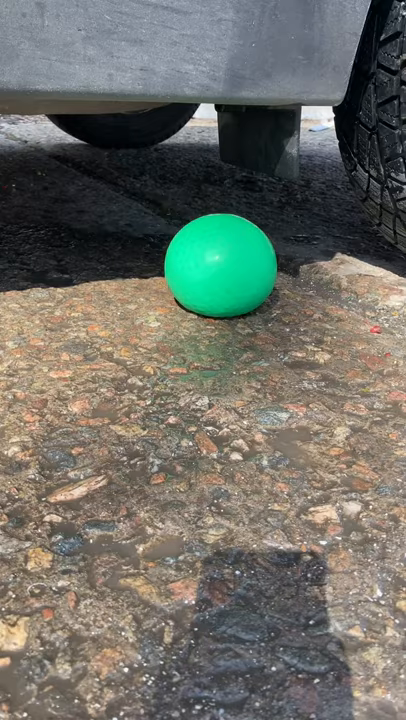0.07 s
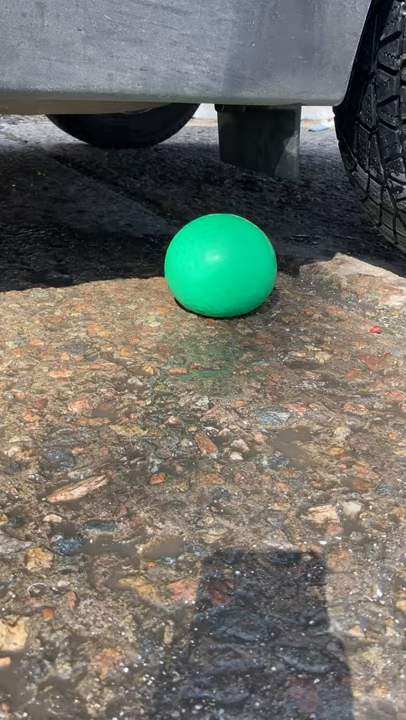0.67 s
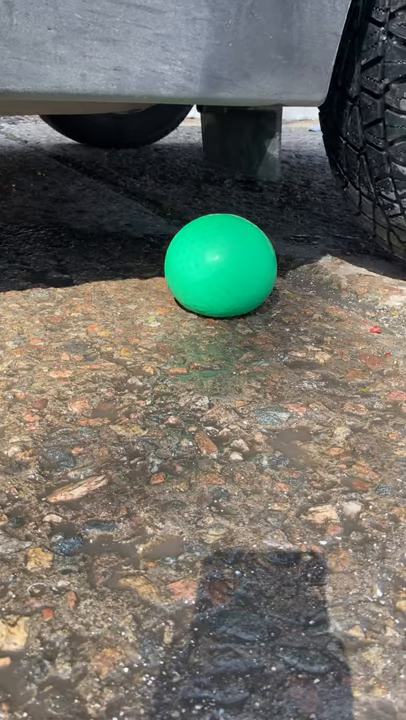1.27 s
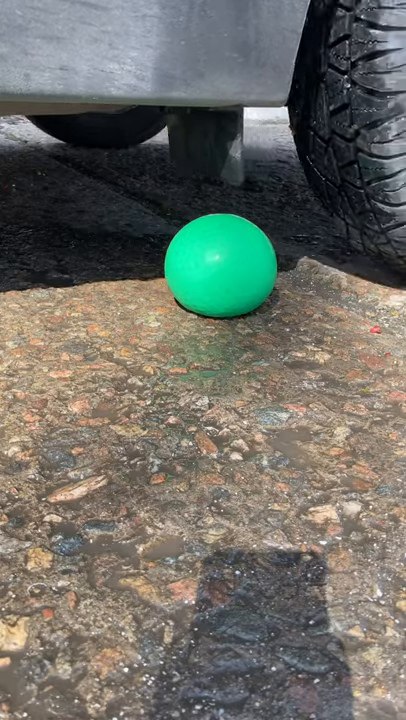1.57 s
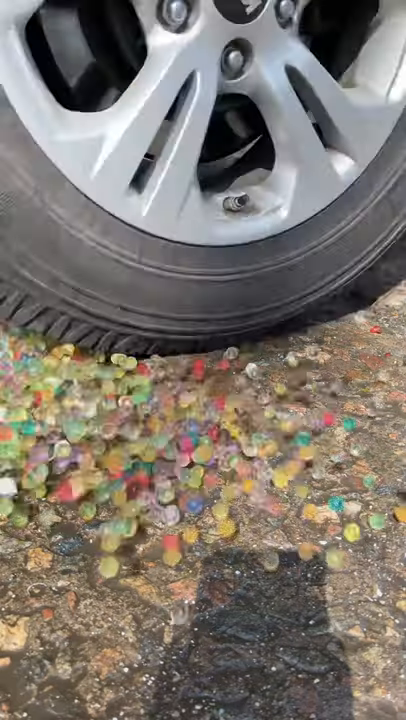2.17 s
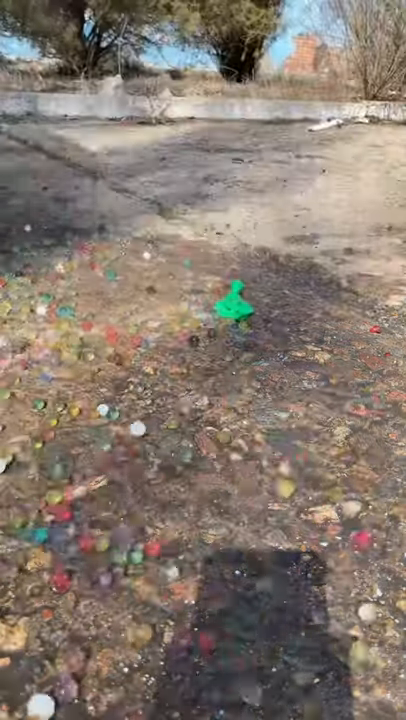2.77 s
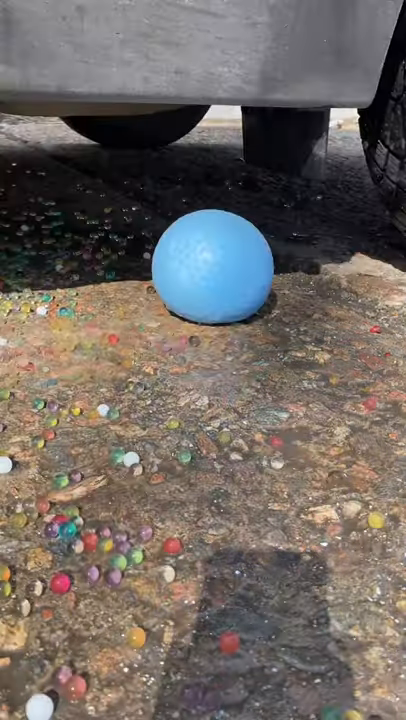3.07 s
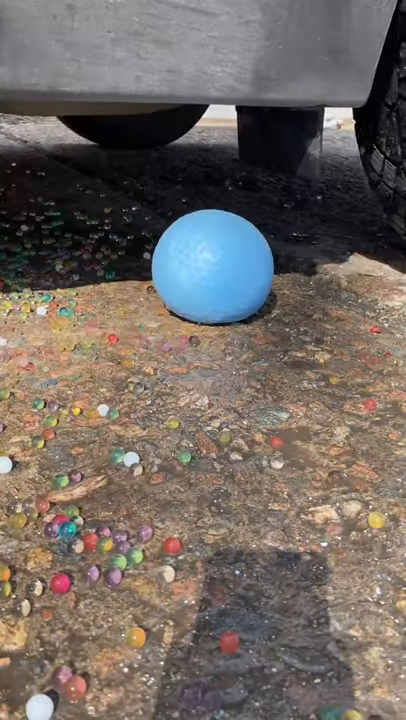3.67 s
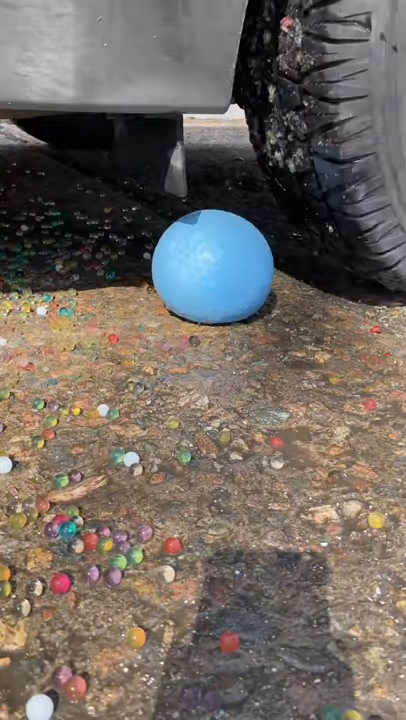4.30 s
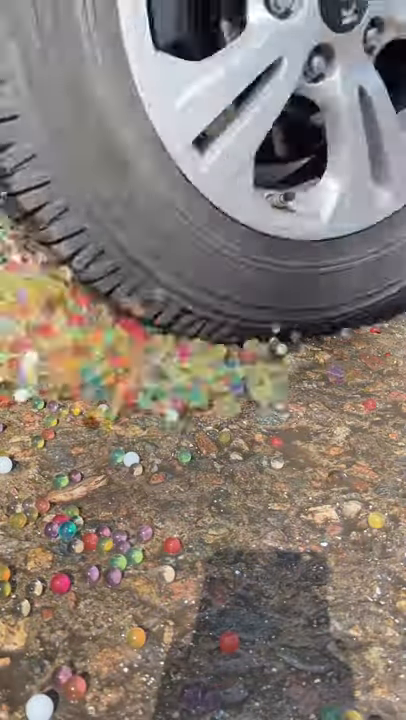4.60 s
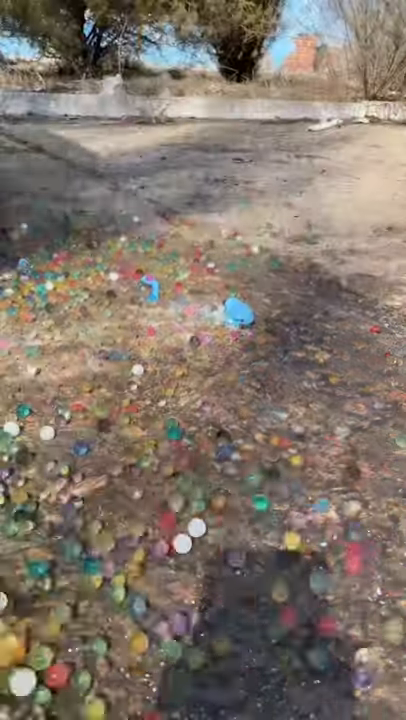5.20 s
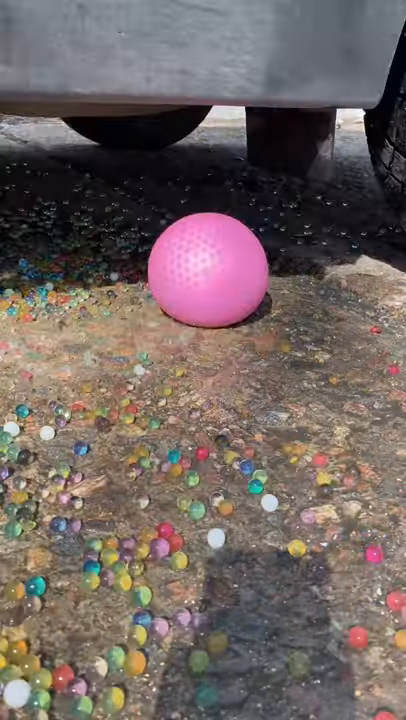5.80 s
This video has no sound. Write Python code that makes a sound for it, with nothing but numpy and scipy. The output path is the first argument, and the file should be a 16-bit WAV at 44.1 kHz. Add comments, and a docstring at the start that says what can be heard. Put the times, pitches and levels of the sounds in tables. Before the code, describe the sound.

A car idles outdoors with a low throb and light valve clatter, heard close from the concrete. At about 1.1 seconds it pulls forward, the engine rising into a growl as grit crunches under the tyre. At 2 seconds a balloon bursts with a sharp rubbery crack and thump, and the engine suddenly drops in level. Wet beads snap and gush from about 2.2 seconds, thinning into patter and small plips by 2.7. At 3 seconds the sound cuts back to idle with a dull tick. The car moves off again around 3.6 seconds, and a second balloon bursts at 4.5. Another wet spray follows from 4.6 to 4.9 seconds, with sharp snaps near its end. Stray beads bounce and the wet tread sizzles faintly over the receding engine. At 5.4 seconds the sound jumps back to idle.

```python
"""On concrete, heard from the ground, a car rolls over two balloons filled with water beads. Its firings
excite exhaust, block and valve gear as it idles, then pulls away with grit crunching under the tyre.
The stretched rubber rips and cracks open, the car's level dips, and wet beads spray, pop and bounce:
a mass of small damped oscillators. The sound jumps back to idle, the car bursts the second balloon
in the same way, and the sound jumps to idle once more."""
import sys
import numpy as np
from scipy import signal
from scipy.fft import rfft, irfft, next_fast_len
from scipy.io import wavfile
from scipy.ndimage import uniform_filter1d

SR = 44100
rng = np.random.default_rng(int(sys.argv[2]) if len(sys.argv) > 2 else 0)


def log_audio(samples):
    """Write samples as a 16-bit WAV file to the path given in sys.argv[1]."""
    # one column per channel
    frames = np.atleast_2d(samples).T
    # limit to full scale, then quantise
    limited = np.clip(frames, -1, 1)
    pcm = np.round(limited * 32767).astype(np.int16)
    wavfile.write(sys.argv[1], SR, pcm)


N = 257984
T = np.arange(N) / SR

# Each row, one balloon: tear time in s, level in dB and ring in Hz; crack time in s and level in dB;
# thump time in s, level in dB, pitch fall in Hz and time for half that fall in s; slap level in dB.
RUPTURES = [(1.9741, -17.5, 5900, 1.9808, -15.5, 1.9828, -11.5, 900, .00042, -21),
            (4.4672, -20.5, 4905, 4.4748, -13.5, 4.4783, -11.5, 560, .0014, -27)]
# Each row, one balloon's beads: start and length of the full gush in s, its level in dB,
# its decay in s, level of the trickle in dB.
GUSHES = [(2.193, 0.086, -28.5, 0.1, -48.5), (4.632, 0.23, -36.5, 0.045, -36)]
# Each row, one drive: moving-off time in s, then the fading after the burst in dB per s,
# first of the exhaust, then of block and clatter.
DEPARTURES = [(1.13, 6.5, 12), (3.555, 2.5, 6.5)]
OPENS_S = [row[3] for row in RUPTURES]  # each balloon cracks open
BACK_TO_IDLE_S = (3.0335, 5.435)
SPRAY_ATTACK_S, DIP_ATTACK_S = 0.019, 0.014
EXHAUST_DB = -29  # base level at idle


def balloons():
    """Release of elastic energy: rubber rips, cracks open and flutters; the filling slaps and thumps."""
    # Spectra of tear, crack and slap. Each row: frequency in Hz, level in dB.
    tear_colour = [(200, -22.5), (900, -9), (2500, -3), (4000, -2), (6000, -3), (7000, -12.5), (16000, -17)]
    crack_colour = [(150, -12), (380, 7), (750, 0), (1300, 0), (2500, 1), (4000, 0.5), (6500, -4.5),
                    (8000, -5), (12000, 0), (16000, -5)]
    slap_colour = [(100, -14), (330, -3), (470, 1), (620, -3), (850, -13), (1150, -8), (1500, -16),
                   (5000, -44)]
    out = np.zeros(N)
    for rupture in RUPTURES:
        tear_s, tear_db, tear_hz, crack_s, crack_db = rupture[:5]
        thump_s, thump_db, fall_hz, glide_s, slap_db = rupture[5:]
        tear = puff(tear_colour, hold_s=0.0026, decay_s=0.005)
        add(out, tear_s, undb(tear_db) * resonant(tear, [(tear_hz, 400, 0)]))
        add(out, crack_s, undb(crack_db) * puff(crack_colour, hold_s=0.003, decay_s=0.0019))
        shreds = puff(tear_colour, hold_s=0.0117, decay_s=0.011)
        add(out, crack_s, undb(crack_db - 16) * shreds)
        add(out, crack_s, undb(slap_db) * puff(slap_colour, hold_s=.005, decay_s=0.002))
        add(out, thump_s, undb(thump_db) * thump(fall_hz, glide_s))
    return out


def thump(fall_hz, glide_s, end_hz=20, decay_s=.0115, kick_s=0.0012, size=4096):
    """Volume displacement: the filling kicks the air, and the pitch dives as the balloon opens out."""
    t = np.arange(size) / SR
    hz = fall_hz / (1 + t / glide_s) + end_hz
    level = np.exp(-t / decay_s) + undb(-5) * np.exp(-t / kick_s)
    return np.sin(2 * np.pi * np.cumsum(hz) / SR) * level


def spray():
    """Superposed clicks and bubble tones: wet beads trickle, then gush as the tyre flattens the balloon."""
    # Each row: frequency in Hz, level in dB.
    bead_colour = [(200, -21.5), (700, -21), (1200, -8.5), (1700, -4.5), (2800, 0.5), (4200, -1.5),
                   (5300, -8), (7000, -7), (10000, -9), (16000, -10)]
    trickle_delay_s, trickle_decay_s = 0.067, 0.13
    flow = np.zeros(N)
    for (start_s, length_s, gush_db, decay_s, trickle_db), open_s in zip(GUSHES, OPENS_S):
        end_s = start_s + length_s
        flow += undb(gush_db) * envelope(start_s, end_s, SPRAY_ATTACK_S, decay_s)
        trickle = envelope(open_s + trickle_delay_s, end_s, SPRAY_ATTACK_S, trickle_decay_s)
        flow += undb(trickle_db) * trickle
    crackle = unit(colour(patter(per_second=12000, spread_db=3.0, cycles=3.5), bead_colour))
    bubbles = unit(colour(patter(per_second=1200, spread_db=1.5, cycles=12), bead_colour))
    return unit(crackle + undb(-9) * bubbles) * clumps(per_second=140, spread_db=2.5) * flow


def snaps(relative_bandwidth=0.55, size=2048):
    """Damped resonance: a bead or bit of grit snaps under the tread with a short ring and a splash."""
    # Each row: start in s, peak in dB, ring in Hz, decay in s, relative level of the splash in dB.
    pops = [(2.071, -34, 3300, 0.0039, -18), (2.076, -32, 3280, .007, -26), (2.1168, -31, 2600, .003, -22),
            (2.136, -29, 2200, 0.0036, -16), (2.188, -13, 2240, 0.0023, -14),
            (2.206, -12, 2330, 0.0072, -19.5), (2.212, -13, 3570, 0.0044, -20.5),
            (2.25, -15.5, 2000, .005, -20), (2.253, -12, 3270, 0.0045, -26), (2.267, -15, 2900, .006, -16),
            (2.282, -11.5, 3010, 0.012, -18), (2.289, -16, 2500, .004, -19), (2.307, -11, 2930, 0.006, -15),
            (2.329, -21, 7500, .002, -6), (2.356, -11, 2640, 0.0044, -12),
            (2.4134, -13.5, 3000, 0.0016, -4), (2.443, -18.5, 2000, 0.0022, -4),
            (2.489, -21.5, 2780, 0.0017, -17), (2.5546, -27, 1280, 0.016, -8),
            (2.616, -33, 2190, 0.0022, -12), (2.6775, -20.5, 1800, 0.0016, -2),
            (4.5382, -15.5, 2770, .003, -29), (4.565, -23.5, 2700, 0.0067, -22),
            (4.6084, -20, 2000, 0.0056, -25), (4.6426, -15.5, 1790, .007, -22),
            (4.649, -12, 2500, .004, -18), (4.663, -12.5, 2675, 0.0024, -19),
            (4.6938, -18, 2700, .004, -27), (4.724, -16, 2796, 0.0079, -19), (4.757, -3, 3840, 0.001, -36),
            (4.799, -18, 2790, .006, -10), (4.807, -17.5, 3220, .003, -17),
            (4.8414, -16, 3470, 0.0069, -24), (4.864, -22, 3000, 0.0039, -22),
            (4.9267, -6, 3320, 0.004, -2), (4.936, -21, 2320, .003, -10),
            (5.098, -23.5, 520.2, 0.0029, -25), (5.142, -25, 710, .003, -21)]
    # Each row: frequency in Hz, level in dB.
    splash_colour = [(300, -9.5), (1500, -1), (4500, -1.5), (7000, -1), (16000, -7.5)]
    out, t = np.zeros(N), np.arange(size) / SR
    for start_s, db, hz, decay_s, splash_db in pops:
        push = rng.standard_normal(size) * np.exp(-t / decay_s)
        resonance = signal.iirpeak(hz, 1 / relative_bandwidth, fs=SR)
        pop = signal.lfilter(*resonance, signal.lfilter(*resonance, push))
        pop += undb(splash_db) * colour(push, splash_colour, size=size)
        add(out, start_s, undb(db) * pop / np.abs(pop).max())
    return out


def wheel(beads):
    """Sympathetic vibration: the beads are heard with the faint ringing they excite in the alloy wheel."""
    # Each row: frequency in Hz, bandwidth in Hz, gain in dB.
    wheel_modes = [(2534, 14, -2), (2727, 12, -4), (2850, 16, -3), (3040, 20, -2), (3240, 18, -5.5),
                   (3500, 20, -13), (3600, 17, -5.5), (4080, 22, -4)]
    return resonant(beads, wheel_modes)


def splatter(relative_db=-12, decay_s=0.19):
    """Soft impacts: the wet mass of beads lands on concrete in a low rustle that outlasts each gush."""
    # Each row: frequency in Hz, level in dB.
    splatter_colour = [(200, -10), (550, -3.5), (800, -3.5), (1100, 1.5), (1650, -2.5), (3000, -10),
                       (6000, -15), (16000, -24)]
    landing = sum(undb(db + relative_db) * envelope(s, s + length_s, SPRAY_ATTACK_S, decay_s)
                  for s, length_s, db, *_ in GUSHES)
    return unit(colour(patter(per_second=6000, spread_db=2.5, cycles=1.8), splatter_colour)) * landing


def plips(glide_per_s=9, splash_db=-9, size=2048):
    """Bubble resonance: a wet bead lands and traps air, which rings with a short rising tone."""
    # Each row: start in s, level in dB, starting pitch in Hz, time to the peak in s.
    landings = [(2.395, -26, 1200, 0.0014), (2.406, -26, 1640, 0.0016), (2.48, -31.5, 2300, .0022),
                (2.524, -33, 910, 0.0015), (2.552, -31.5, 1170, 0.0017)]
    out, t = np.zeros(N), np.arange(size) / SR
    for start_s, db, hz, rise_s in landings:
        tone = np.sin(2 * np.pi * hz * t * (1 + glide_per_s * t / 2))
        splash = undb(splash_db) * rng.standard_normal(size)
        swell = t / rise_s * np.exp(1 - t / rise_s)
        add(out, start_s, undb(db) * swell * (tone + splash))
    return out


def strays(level_db=-45):
    """Sparse impacts: single beads bounce on the concrete during each gush and a while after it."""
    # Each row: frequency in Hz, level in dB.
    bounce_colour = [(300, -20.5), (900, -2), (1500, 0.5), (2800, -1), (5000, -11), (16000, -20)]
    bouncing = sum(envelope(s, s + length_s, SPRAY_ATTACK_S, decay_s=0.22) for s, length_s, *_ in GUSHES)
    bounces = unit(colour(patter(per_second=160, spread_db=3.5, cycles=2.4), bounce_colour))
    return bounces * bouncing * undb(level_db)


def engine():
    """Periodic excitation: one firing rate drives exhaust, block and valve gear."""
    hz, revs, exhaust_db, block_db, clatter_db = driving()
    cycles = np.cumsum(hz) / SR
    exhaust_cycles = cycles + .5  # half a firing interval apart
    boom = exhaust(exhaust_cycles, revs) * undb(exhaust_db)
    # under load the exhaust's overtones are ragged
    ragged = unit(firings(exhaust_cycles, scatter_db=2, lumpy_db=1)) + undb(-10) * rng.standard_normal(N)
    body = (block(cycles) + growl(ragged, revs)) * undb(block_db)
    return boom + tailpipe(ragged) + body + valve_gear(cycles) * undb(clatter_db)


def driving():
    """Resonance, load and level dips: gives firing rate, revs (0-1), exhaust, block and clatter in dB."""
    # One list a drive. Each row: time in s, firings per s.
    firing_rates = [
        [(0.04, 27.5), (0.71, 26.4), (0.99, 27.8), (1.2, 29.3), (1.51, 39.5), (1.6, 43), (1.8, 45.8),
         (2.11, 46), (2.35, 43), (2.43, 44), (3.02, 40.2)],
        [(3.05, 27.5), (3.5, 26.2), (3.68, 30.2), (3.99, 43.2), (4.2, 45.1), (4.77, 48.5), (4.83, 50.4),
         (5.17, 50.3), (5.42, 48.4)],
    ]
    # The car's level dips after each burst and stays a little lower. Each row: depth for the exhaust
    # in dB, depth for block and clatter in dB, recovery in s.
    level_dips = [(22.6, 12.5, 0.2), (15.7, 2.5, 0.48)]
    idle_hz, pull_hz = 26.44, 45.1
    boom_hz, boom_width_hz = 39.15, 5.3  # the exhaust's resonance
    load_lead_s, dip_delay_s = 0.28, .005
    hz, begins_s = np.full(N, idle_hz), 0
    for rate, end_s in zip(firing_rates, BACK_TO_IDLE_S):
        hz = np.where((T >= begins_s) & (T < end_s), np.interp(T, *np.transpose(rate)), hz)
        begins_s = end_s
    revs = np.clip((hz - idle_hz) / (pull_hz - idle_hz), 0, 1)
    boom = np.exp(-((hz - boom_hz) / boom_width_hz) ** 2)
    exhaust_db = EXHAUST_DB + 4.5 * revs + 5 * boom
    block_db, clatter_db = -39.5, -42 + 7.5 * revs
    for departure, dips, open_s, end_s in zip(DEPARTURES, level_dips, OPENS_S, BACK_TO_IDLE_S):
        move_s, low_db_per_s, high_db_per_s = departure
        low_dip_db, high_dip_db, recovery_s = dips
        active = T < end_s
        load = active * inertia(move_s - load_lead_s, lag_s=0.26)
        since_s = active * np.maximum(T - open_s - dip_delay_s, 0)
        after_burst = np.minimum(since_s / DIP_ATTACK_S, 1)
        dip = after_burst * np.exp(-(since_s / recovery_s) ** 2)
        high_loss_db = high_dip_db * dip + high_db_per_s * since_s
        exhaust_db = exhaust_db - 0.94 * after_burst - low_dip_db * dip - low_db_per_s * since_s
        block_db = block_db + 8.5 * load - 6.5 * after_burst - high_loss_db
        clatter_db = clatter_db - 3 * after_burst - high_loss_db
    return hz, revs, exhaust_db, block_db, clatter_db


def exhaust(cycles, revs):
    """Pipe resonance: the pulses boom, roughened by rushing gas at idle and firm when pulling."""
    # Each row: frequency in Hz, level in dB.
    idle_colour = [(15, -37.5), (26, -19.5), (44, -23.5), (53, -4), (79, 3), (91, -4.5), (105, -9.5),
                   (135, -16.5), (180, -26.5), (270, -43.5), (400, -59.5), (800, -94)]
    pulling_colour = [(15, -46), (41, -24.5), (50, -12), (58, -1.5), (66, 1.5), (87, 1.5), (100, -4),
                      (125, -15.5), (148, -18.5), (170, -32.5), (235, -43), (400, -63.5), (800, -95.5)]
    rough = unit(firings(cycles, scatter_db=0.35, lumpy_db=0.5)) + undb(-26) * rng.standard_normal(N)
    firm = firings(cycles, scatter_db=.8, lumpy_db=.3)
    idling = steady(colour(rough, idle_colour))
    pulling = steady(colour(firm, pulling_colour))
    return ports(steady((1 - revs) * idling + revs * pulling))


def tailpipe(pulses, swell_s=.11):
    """Directivity: under load the tailpipe drones while it faces the microphone."""
    # Each row: frequency in Hz, level in dB.
    drone_colour = [(60, -40), (105, -19.5), (130, 0), (150, 0), (170, -7.5), (195, -4.5), (225, -17.5),
                    (400, -50.5)]
    # Each row: start and end of the full drone in s, level in dB.
    facing_spans = [(1.6, 1.98, -33.5), (2.5, 3.02, -41.5), (4.048, 4.465, -32.5), (5.07, 5.42, -36)]
    facing = sum(undb(db) * envelope(s, end_s, swell_s, DIP_ATTACK_S) for s, end_s, db in facing_spans)
    return ports(steady(colour(pulses, drone_colour))) * facing


def growl(pulses, revs, relative_db=-6):
    """Harmonics of the firing rate: a pitched growl from moving off until the balloon opens."""
    # Each row: frequency in Hz, level in dB.
    growl_colour = [(100, -41.5), (220, -15.5), (262, 4), (310, -13.5), (400, -8), (500, -7), (600, -14),
                    (1200, -41.5)]
    approaching = sum((T > move_s) * envelope(move_s, open_s, DIP_ATTACK_S, DIP_ATTACK_S)
                      for (move_s, *_), open_s in zip(DEPARTURES, OPENS_S))
    return ports(steady(colour(pulses, growl_colour))) * revs * approaching * undb(relative_db)


def block(cycles):
    """Structure-borne sound: each firing knocks in the engine block."""
    # Each row: frequency in Hz, level in dB.
    block_colour = [(40, -24.5), (110, -1), (175, 1.5), (215, -3), (265, 0), (335, 0), (420, -1), (462, 5),
                    (500, 6.5), (550, -3.5), (640, -4), (710, -2), (850, -12.5), (1400, -33.5),
                    (4000, -60.5)]
    knocks = throb(firings(cycles, scatter_db=1.8, lumpy_db=1.5), decay_s=.011, floor=.5)
    return wide(lambda: unit(colour(knocks * rng.standard_normal(N), block_colour)))


def valve_gear(cycles):
    """Forced vibration: valve clatter rings in the panels and cavities of the engine bay."""
    # Each row: frequency in Hz, level in dB.
    clatter_colour = [(300, -30), (720, -2), (1000, -1.5), (1230, -2.5), (1550, -1.5), (1950, -1.5),
                      (2400, -1), (2850, -6.5), (3400, -6.5), (3800, -8.5), (4200, -7.5), (4500, -11),
                      (5000, -12.5), (7000, -13), (10000, -21.5), (16000, -19)]
    # Each row: frequency in Hz, bandwidth in Hz, gain in dB.
    bay_modes = [(624, 36, -4), (999, 70, -4), (1408, 47, -2.5), (1577, 55, -8), (2194, 44, -11.5),
                 (3315, 150, -7.5), (4050, 52, -8), (4770, 130, -4.5)]
    ticks = throb(firings(cycles, scatter_db=1.6, lumpy_db=1.0), decay_s=0.019, floor=1.6)
    return wide(lambda: unit(resonant(colour(ticks * grit(spread_db=1.0), clatter_colour), bay_modes)))


def tyre(arrival_db=-36, growth_db_per_s=6, whirr_hz=486, whirr_width_hz=36):
    """Rolling noise: grit crunches and the tread whirrs, louder as the wheel speeds up and nears."""
    # Each row: frequency in Hz, level in dB.
    grit_colour = [(300, -8.5), (700, -3), (1150, -10), (1420, -10), (1560, 4.5), (2000, -.5), (2800, -8),
                   (3220, -3.5), (3430, 7), (3650, -7), (4400, -11.5), (5500, -9), (7400, 1), (9000, -8),
                   (16000, -15.5)]
    approach = np.zeros(N)
    for (move_s, *_), open_s in zip(DEPARTURES, OPENS_S):
        nearness = undb(arrival_db - growth_db_per_s * np.abs(open_s - T))
        approach += inertia(move_s, lag_s=0.14) * nearness * (T < open_s)
    bunches = clumps(per_second=160, spread_db=6)
    grains = unit(colour(patter(per_second=1500, spread_db=3.0, cycles=4.1), grit_colour))
    whirr = unit(ring(rng.standard_normal(N), [(whirr_hz, whirr_width_hz, 0)]))
    return (grains * bunches + undb(-2.5) * whirr) * approach


def wet_tread(level_db=-49.5, decay_s=.3):
    """Adhesion: the tread, wet from crushed beads, peels off the concrete with a fine sizzle."""
    # Each row: frequency in Hz, level in dB.
    sizzle_colour = [(400, -19), (1500, -4), (4000, -6), (7000, -1), (16000, 4)]
    wetness = sum(envelope(s + length_s, s + length_s, SPRAY_ATTACK_S, decay_s) * (T < end_s)
                  for (s, length_s, *_), end_s in zip(GUSHES, BACK_TO_IDLE_S))
    sizzle = unit(colour(patter(per_second=3000, spread_db=1.5, cycles=3), sizzle_colour))
    return sizzle * wetness * undb(level_db)


def rumble(idle_db=-52.5):
    """Roughness excitation: the concrete raises dull swells and body rattle
    over a low rumble that rises and falls with the engine."""
    # Each row: centre in s, half length in s, level in dB, relative level of the rattle in dB.
    bumps = [(1.644, 0.15, -43, -15), (2.444, 0.15, -38.5, -19), (3.332, 0.17, -38, -20),
             (4.224, .05, -27.5, -12), (4.8, 0.12, -38, -22), (5.1, 0.1, -32.5, -3),
             (5.325, 0.088, -37.5, -9)]
    low_colour = [(18, -24.5), (45, -6.5), (72, 0.5), (110, -8.5), (200, -13), (500, -39), (2000, -83)]
    rattle_colour = [(80, -20), (200, -4.5), (400, 0.5), (700, -2), (1200, -6.5), (3000, -25.5),
                     (8000, -44)]
    low = unit(colour(rng.standard_normal(N), low_colour))
    rattle = unit(colour(grit(spread_db=3.5), rattle_colour))
    swells = sum(undb(db) * np.exp(-((T - s) / width_s) ** 2) * (low + undb(rattle_db) * rattle)
                 for s, width_s, db, rattle_db in bumps)
    _, revs, exhaust_db, _, _ = driving()
    return swells + low * undb(idle_db + 9 * revs + exhaust_db - EXHAUST_DB)


def tick(level_db=-25):
    """A broadband transient: one dull tick as the sound first jumps back to idle."""
    out = np.zeros(N)
    click = puff([(200, 4), (2000, -9.5), (6000, -18.5), (16000, -20)], hold_s=0.00069, decay_s=0.00068)
    add(out, BACK_TO_IDLE_S[0], undb(level_db) * click)
    return out


def reflections(x, t60_s, size=8192):
    """Multiple reflection between ground and underbody: a short tail without bass, one for each side."""
    tails = rng.standard_normal((2, size)) * undb(-60 * np.arange(size) / SR / t60_s)
    tails /= np.linalg.norm(tails, axis=1, keepdims=True)
    x = signal.sosfilt(signal.butter(4, [380, 6500], "band", fs=SR, output="sos"), x)
    return signal.fftconvolve(x[None], tails, axes=1)[:, :N]


def ports(x, direction=1):
    """Diffraction round a phone: the nearer microphone port leads (direction 1 left, -1 right)."""
    # Each row: frequency in Hz, phase lead of the left port in radians at direction 1.
    phase_lead = [(60, 0), (250, 0.33), (480, 1.1), (700, 1.5), (950, 1.45), (1200, 0.98), (1640, 0.45),
                  (2800, 1.5), (4200, 1.1), (4950, 1.9), (5800, 1.45), (7300, 2.3), (8000, 3.14),
                  (12200, 3.14), (12900, 1.7), (16000, 1.2)]
    # Each row: frequency in Hz, left minus right level in dB at direction 1.
    balance = [(50, 0), (130, -2.2), (250, -3.5), (500, -4.5), (720, 1.2), (950, 5.5), (1550, 5), (2100, 1),
               (3000, -.7), (7000, 0), (16000, 0)]
    size = next_fast_len(N + 4096)
    hz = np.arange(size // 2 + 1) * SR / size
    half = direction * np.array([[.5], [-.5]])
    response = undb(half * on_log_axis(balance, hz)) * np.exp(1j * half * on_log_axis(phase_lead, hz))
    return irfft(rfft(x, size) * response, size)[:, :N]


def wide(play):
    """An extended source: most lies to the left, a weaker incoherent part to the right."""
    return ports(play()) + undb(-11) * ports(play(), -1)


def firings(cycles, scatter_db, lumpy_db):
    """Impulse train, one a cycle: the four cylinders differ a little, and so does each firing."""
    at = np.flatnonzero(np.diff(np.floor(cycles)))
    cylinder_db = lumpy_db * np.cos(np.arange(len(at)) * np.pi / 2)
    pulses = np.zeros(N)
    pulses[at] = undb(scatter_db * rng.standard_normal(len(at)) + cylinder_db)
    return pulses


def throb(pulses, decay_s, floor):
    """Exponential relaxation: an envelope that jumps at each firing and sinks towards a floor."""
    tails = signal.lfilter([1], [1, -np.exp(-1 / (decay_s * SR))], pulses)
    return steady(tails + floor)


def patter(per_second, spread_db, cycles, count=24):
    """Poisson impacts: damped sines of random size, the high ones the most numerous."""
    out, t = np.zeros(N), np.arange(1024) / SR
    pitches = np.geomspace(500, 15000, count)
    for hz in pitches:
        at = np.flatnonzero(rng.random(N) < per_second * hz / pitches.sum() / SR)
        sizes = undb(spread_db * np.minimum(rng.exponential(size=len(at)), np.pi))
        hits = np.zeros(N)
        hits[at] = sizes * rng.choice([-1, 1], len(at))
        click = np.sin(2 * np.pi * hz * t) * np.exp(-t * hz / cycles)
        out += signal.oaconvolve(hits, click)[:N]
    return out


def clumps(per_second, spread_db):
    """Random amplitude modulation: a gain that gathers grains into bunches."""
    knots_s = np.cumsum(rng.exponential(1 / per_second, 4096))
    return unit(undb(spread_db * np.interp(T, knots_s, rng.uniform(-1.3, 1, len(knots_s)))))


def grit(spread_db):
    """Modulated noise: a hiss that crackles as its level jumps every 20 samples."""
    noise = rng.standard_normal(N)
    jumps = np.repeat(rng.standard_normal(N // 20 + 1), 20)[:N]
    return unit(noise * undb(spread_db * jumps))


def puff(points, hold_s, decay_s, size=4096):
    """A noise transient that holds, then decays exponentially."""
    t = np.arange(size) / SR
    return colour(rng.standard_normal(size) * np.exp(-np.maximum(t - hold_s, 0) / decay_s), points)


def ring(x, modes):
    """Modal sum driven by x. Each mode: frequency in Hz, bandwidth in Hz, gain in dB."""
    return sum(undb(db) * signal.lfilter(*signal.iirpeak(hz, hz / width, fs=SR), x)
               for hz, width, db in modes)


def resonant(x, modes):
    """Superposition of a sound and the modes it excites."""
    return x + ring(x, modes)


def colour(x, points, size=16384):
    """Minimum-phase filter of unit energy. Each point: frequency in Hz, level in dB."""
    hz = np.arange(size // 2 + 1) * SR / size
    cepstrum = irfft(np.log(undb(on_log_axis(points, hz))))
    # folding the cepstrum makes the response causal
    cepstrum[1:size // 2] *= 2
    cepstrum[size // 2 + 1:] = 0
    response = irfft(np.exp(rfft(cepstrum)))
    return signal.fftconvolve(x, response / np.linalg.norm(response))[:len(x)]


def inertia(start_s, lag_s):
    """Critically damped rise from 0 to 1 of a mass pushed from start_s on."""
    u = np.maximum(T - start_s, 0) / lag_s
    return 1 - (1 + u) * np.exp(-u)


def envelope(start_s, end_s, attack_s, decay_s):
    """Exponential growth up to start_s, a hold until end_s, then exponential decay."""
    return np.exp(np.minimum(T - start_s, 0) / attack_s - np.maximum(T - end_s, 0) / decay_s)


def steady(x, size=5100):
    """Division by the running rms evens out the slow level and keeps the throb."""
    return x / np.sqrt(uniform_filter1d(x ** 2, size) + 1e-12)


def on_log_axis(points, hz):
    """Interpolate (Hz, value) points in log frequency."""
    f, value = np.transpose(points)
    return np.interp(np.log(np.maximum(hz, 1)), np.log(f), value)


def add(out, start_s, sound):
    """Superpose a short sound at its time."""
    i = int(start_s * SR)
    out[i:i + len(sound)] += sound[:len(out) - i]


def undb(db):
    """Decibels to amplitude ratio."""
    return 10 ** (np.asarray(db) / 20)


def unit(x):
    """Scale to rms 1."""
    return x / np.sqrt(np.mean(x ** 2))


def scene():
    """Superposition of car, beads and bursts, direct and reflected under the body."""
    car = engine() + ports(rumble() + tyre() + wet_tread())
    beads = wheel(wide(spray) + ports(snaps()))
    landing = ports(splatter(), direction=0.34) + ports(plips() + strays())
    direct = car + beads + landing + ports(balloons() + tick(), direction=0.81)
    return direct + undb(-11.5) * reflections(direct[0], t60_s=0.098)


def record(dry, silence_s=.037, top_hz=16000):
    """Saturation and band limiting: after a moment of silence, peaks are capped and top treble removed."""
    capped = np.clip(dry, -.9, .9) * (T > silence_s)
    return signal.sosfilt(signal.ellip(10, .2, 80, top_hz, fs=SR, output="sos"), capped)


dry = scene()
out = record(dry)
log_audio(out)
```